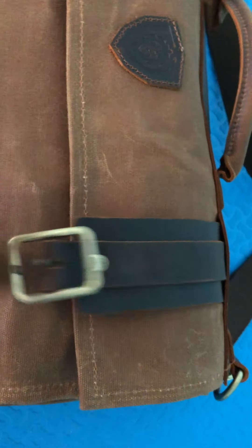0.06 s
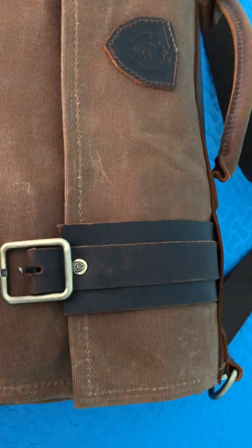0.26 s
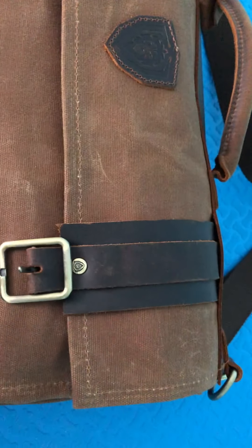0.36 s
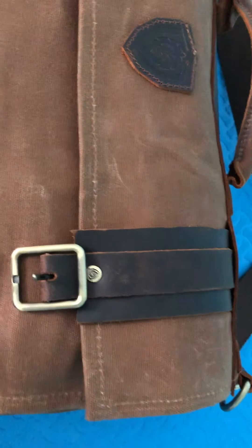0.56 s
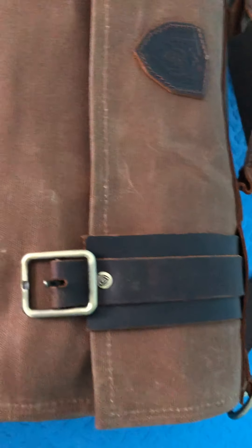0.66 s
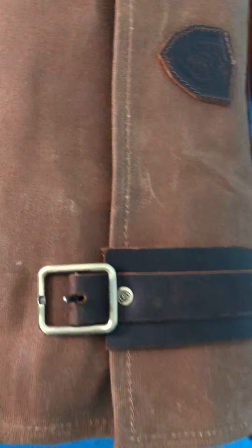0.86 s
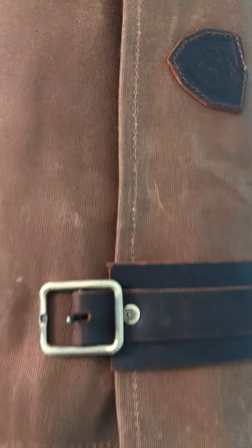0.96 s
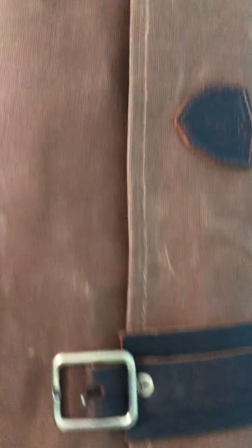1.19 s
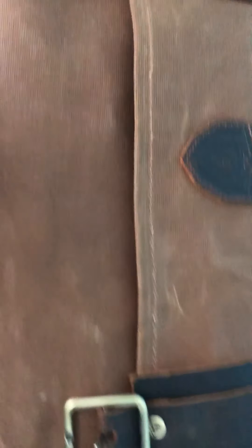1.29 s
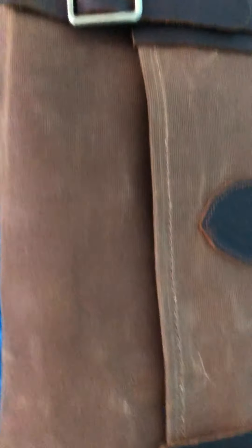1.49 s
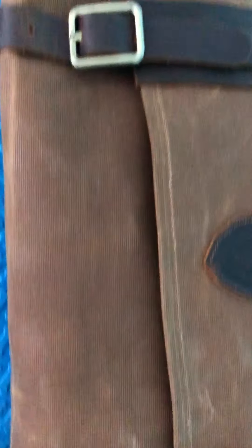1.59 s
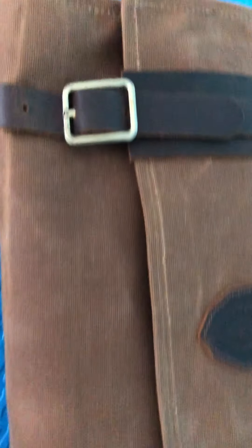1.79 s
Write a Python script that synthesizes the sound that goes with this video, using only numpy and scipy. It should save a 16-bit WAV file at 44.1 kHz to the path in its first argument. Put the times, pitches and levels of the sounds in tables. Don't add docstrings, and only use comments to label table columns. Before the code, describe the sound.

Buckle slap on a stuffed canvas bag, small metallic bounce and ticks, followed by soft fabric rubbing

```python
import sys
import numpy as np
from scipy import signal
from scipy.fft import rfft, irfft
from scipy.io import wavfile
from scipy.ndimage import uniform_filter1d

SR = 44100
rng = np.random.default_rng(int(sys.argv[2]) if len(sys.argv) > 2 else 0)


def convert_level_to_amplitude(level_db):
    exponent = np.asarray(level_db, float) / 20
    return 10 ** exponent


def unload_wav(signal):
    wavfile.write(
        sys.argv[1],
        SR,
        np.round(np.clip(np.atleast_2d(signal).T, -1, 1) * 32767).astype(np.int16),
    )


N = 81585

# (frequency [Hz], density [dB])
AIR_TONE = [(25, -29.5), (45, -4), (100, -9.5), (200, -14.5), (400, -22), (1600, -35), (16300, -39),
            (17500, -52.5)]
# (frequency [Hz], t60 [s])
ROOM_DECAY = [(100, 0.93), (260, 0.33), (700, .4), (1840, 0.4), (4850, 0.27), (9000, 0.36), (16000, .12)]
# (frequency [Hz], level [dB])
ROOM_TONE = [(100, -0.5), (300, 1.5), (700, -0.5), (1300, 2.5), (2500, -3), (5500, -6.5), (8000, -8.5),
             (16000, -18.5)]
# (start [s], rise [s], fall t60 [s], level [dB])
BRIGHT_STROKES = [
    (0.778, 0.081, 0.69, -63),
    (0.9455, 0.055, 0.31, -55),
    (.95, 0.0053, 0.6, -60.5),
    (1.465, 0.048, 0.47, -60.5),
    (1.67, 0.028, 0.42, -63),
    (0.38, 0.02, 0.33, -74.5),
]
# (frequency [Hz], density [dB])
BRIGHT_TONE = [(120, -24), (200, -3.5), (372, -2.5), (574, -8), (643, -6.5), (991, -4.5), (15200, -11.5),
               (17000, -12), (18000, -29.5)]
# (start [s], rise [s], fall t60 [s], level [dB])
DULL_STROKES = [(1.565, 0.0055, 0.41, -57.5), (1.7, 0.026, 0.22, -67.5), (.975, 0.024, 0.26, -64),
                (1.685, 0.012, 0.56, -68)]
# (frequency [Hz], density [dB])
DULL_TONE = [(180, -25), (300, 0), (620, -5), (793, -9), (1020, -3.5), (4330, -5), (12000, -22),
             (15600, -55), (22000, -120)]
# (start [s], rise [s], fall t60 [s], level [dB])
SQUEAK_STROKES = [(1.46, 0.045, 0.22, -65), (1.566, .004, 0.41, -66)]
# (start [s], rise [s], fall t60 [s], level [dB])
LEATHER_STROKES = [
    (0, 0.016, 2.3, -62),
    (.09, 0.023, 0.5, -65),
    (.25, 0.022, 1.14, -55),
    (.47, 0.041, 0.28, -58),
    (.54, 0.027, 0.34, -60.5),
]
# (frequency [Hz], density [dB])
LEATHER_TONE = [(120, -28.5), (200, 0), (918, -10.5), (2200, -10.5), (6350, -11), (7230, -20.5),
                (11300, -24.5), (12200, -26.5), (17000, -27.5)]
# (frequency [Hz], width [Hz], level [dB])
STRAP_PEAKS = [(2260, 120, -11.5), (4560, 400, -16)]
# (frequency [Hz], level [dB], t60 [s])
BOOM_MODES = [(85, -43.5, 0.23), (144.5, -38.5, 0.29), (223.7, -42, 0.25)]
# (frequency [Hz], level [dB], t60 [s])
BAG_MODES = [(176, -40, 0.15), (226.9, -27, 0.11), (270, -35, 0.1), (385, -29, 0.12), (493, -37, 0.15),
             (567, -32, 0.17), (610, -38, 0.12), (667.7, -30.5, 0.15), (760, -37, 0.11), (905, -38, .1),
             (1000, -36.5, 0.1), (1116, -36.5, 0.1), (1270, -38, .1), (1373, -35, 0.078), ]
# (time [s], peak [dB], pitch [Hz], t60 [s], crack above ring [dB])
KNOCKS = [(0.0506, -32, 5100, 0.0026, -5), (.0505, -41, 900, 0.0034, -26), (.1205, -43.5, 4500, 0.0038, 4),
          (0.2, -38, 8160, 0.0072, -28.5), (0.2199, -12, 5200, 0.0021, -6),
          (0.2205, -13, 2500, 0.0043, -24), (0.2216, -15, 1200, 0.0066, -33.5),
          (.2228, -9, 680, 0.0071, -43.5), (0.2288, -5, 5730, 0.0022, -14), (0.2294, -21, 1000, 0.014, -23),
          (.3180, -32, 5000, 0.0033, -8), (0.3202, -37.5, 5000, .004, -7), (0.322, -32, 9800, 0.0048, -7),
          (0.3234, -39, 6600, .012, -7), (.3220, -39.5, 380, 0.049, -30), (.3222, -40, 790, 0.022, -30),
          (.2330, -29.5, 8000, 0.0044, -10.5), (.0220, -53.5, 6000, .012, -7),
          (0.0528, -50.5, 450, .025, -26), (0.0576, -49, 7200, .01, -10.5), (.0990, -56, 7000, .008, -7),
          (.1190, -51.5, 2250, 0.013, -10), (0.1262, -50, 600, .02, -27.5),
          (0.175, -51.5, 10500, 0.022, -12), (.1755, -54.5, 7000, .01, -9.5),
          (.1760, -59.5, 5800, .08, -10.5), (0.487, -42.5, 5600, 0.0045, -9),
          (0.4866, -46.5, 1890, 0.013, -22), (0.5002, -42.5, 3360, 0.0052, -9),
          (0.5098, -40, 806, 0.0038, -22), (0.5458, -46, 1740, 0.031, -13), (0.545, -46, 3030, 0.02, -11),
          (.5105, -56, 5020, 0.053, -10), (.5700, -52.5, 2240, 0.06, 1), (.5580, -44, 1905, .01, -4),
          (.5740, -39.5, 407, 0.0046, -9)]
# (time [s], peak [dB], pitch [Hz], t60 [s], crack above ring [dB])
SNAGS = [(0.8821, -47.5, 2940, 0.0033, 3), (0.9852, -44, 3974, .003, 9.5), (1.3030, -54, 4300, 0.0037, 5),
         (1.508, -45.5, 4400, 0.0048, -1), (1.569, -43.5, 4370, 0.0066, -6),
         (1.692, -53.5, 5030, 0.0053, 4)]
# (time [s], low ring [dB], high ring [dB], top ring [dB], long bar ring [dB])
CHINKS = [
    (0.057, -32, -35, -44, -73.5),
    (0.174, -70, -57, -56.5, -80),
    (.2003, -46.5, -45, -46.5, -68),
    (0.2283, -51.5, -50, -34, -53),
    (0.24, -48.5, -32, -50, -63),
    (0.2401, -54.5, -33, -54.5, -69),
    (0.241, -54.5, -33.5, -59.5, -69),
    (0.2435, -54.5, -33.5, -50, -73.5),
    (0.3227, -37, -33, -31.5, -64),
    (0.5703, -75, -72, -72, -89),
]
# (frequency [Hz], level [dB], t60 [s])
LOW_RING = [(11470, -2, .045), (10900, -4, .018), (10300, -10, .008)]
# (frequency [Hz], level [dB], t60 [s])
HIGH_RING = [(15290, 0, .01), (15330, -26, .1), (14400, -7, .007)]
# (frequency [Hz], level [dB], t60 [s])
TOP_RING = [(16450, 0, .01), (16750, -20, .15), (16690, -25, .15)]
# (frequency [Hz], level [dB], t60 [s])
BAR_RING = [(12840, -1, .4), (12862, -16, .3), (11460, -1, .3), (11435, -11, .2), (5770, 0, .15)]
# (frequency [Hz], level [dB])
TREBLE_SHELF = [(17200, 0), (17500, -22), (19300, -26)]

SLAP_S = 0.2215


def evened(x):
    return x / np.sqrt(np.mean(x ** 2) + 1e-20)


def read(points, hz):
    f, value = np.transpose(points)
    return np.interp(np.log(hz + 1), np.log(f + 1), value)


def filtered(x, tone):
    hz = np.fft.rfftfreq(len(x), 1 / SR)
    return irfft(rfft(x) * convert_level_to_amplitude(read(tone, hz)), len(x))


def high_pass(x, order, edge_hz):
    return signal.sosfilt(signal.butter(order, edge_hz, "high", fs=SR, output="sos"), x)


def resonate(x, hz, width):
    turn = np.exp(2j * np.pi * hz * np.arange(len(x)) / SR)
    r = np.exp(-np.pi * width / SR)
    return 2 * (turn * signal.lfilter([1 - r], [1, -r], x / turn)).real


def ring(modes, rise_s):
    t = np.arange(SR // 2) / SR
    dying = sum(convert_level_to_amplitude(db - 60 * t / t60) * np.sin(2 * np.pi * hz * t) for hz, db, t60 in modes)
    return (1 - np.exp(-t / rise_s)) * dying


def add(mix, s, sound):
    part = mix[round(s * SR):][:len(sound)]
    part += sound[:len(part)]


def strokes(table):
    t = np.arange(N) / SR
    power = np.zeros(N)
    for start, rise, fall, db in table:
        swell = np.clip((t - start) / rise, 0, 1)
        decay_db = 60 * np.maximum(t - start - rise, 0) / fall
        power += (swell * convert_level_to_amplitude(db - decay_db)) ** 2
    return np.sqrt(power)


def grit(slips_per_s, spread_db, smooth_db):
    slipping = rng.random(N) < slips_per_s / SR
    size = np.minimum(rng.exponential(1, N), 4)
    slips = slipping * rng.standard_normal(N) * convert_level_to_amplitude(spread_db * size)
    return evened(slips) + convert_level_to_amplitude(smooth_db) * rng.standard_normal(N)


def quiet_room():
    t = np.arange(N) / SR
    hiss, rumble, waver = rng.standard_normal((3, N))
    for _ in range(2):
        rumble = resonate(rumble, 60.13, 8.8)
        waver = uniform_filter1d(waver, size=4000)
    hum_db = -64 + 1.2 * evened(waver)
    hum = np.sqrt(2) * convert_level_to_amplitude(hum_db) * np.sin(2 * np.pi * 121.2 * t + 1.6)
    return convert_level_to_amplitude(-64) * evened(filtered(hiss, AIR_TONE)) + convert_level_to_amplitude(-65.5) * evened(rumble) + hum


def room(x):
    room_db, start_s, spacing = -17, 0.0025, 20
    taps = np.zeros(SR)
    at = np.arange(0, SR - spacing, spacing)
    taps[at + rng.integers(0, spacing, len(at))] = rng.choice([-1., 1.], len(at))
    hz, t, z = signal.stft(taps, SR, nperseg=256)
    decay_db = 60 * t / read(ROOM_DECAY, hz)[:, None]
    tail = signal.istft(z * convert_level_to_amplitude(read(ROOM_TONE, hz)[:, None] - decay_db), SR, nperseg=256)[1]
    fade_in = np.clip(np.arange(len(tail)) / SR / start_s - 1, 0, 1)
    tail = tail / np.linalg.norm(tail) * fade_in
    return convert_level_to_amplitude(room_db) * signal.fftconvolve(x, tail)[:N]


def bag_boom():
    out = np.zeros(N)
    add(out, SLAP_S, ring(BOOM_MODES, 0.014))
    return out


def cloth():
    bright = strokes(BRIGHT_STROKES) * evened(filtered(grit(2500, 2.1, 1.4), BRIGHT_TONE))
    dull = strokes(DULL_STROKES) * evened(filtered(grit(3000, 3.0, 2.5), DULL_TONE))
    squeak = strokes(SQUEAK_STROKES) * evened(resonate(grit(2300, 2.8, 1.6), 4500, 820))
    return bright + dull + squeak


def leather():
    rub = evened(filtered(grit(4000, 2.2, 3.0), LEATHER_TONE))
    peaks = sum(convert_level_to_amplitude(db) * evened(resonate(rub, hz, width)) for hz, width, db in STRAP_PEAKS)
    return strokes(LEATHER_STROKES) * (rub + peaks)


def bag_slap():
    out = np.zeros(N)
    add(out, SLAP_S, ring(BAG_MODES, 0.003))
    return out


def knocks():
    partner_spread, partner_db, crack_hz, crack_t60_s = 0.25, -6.5, 7200, 0.005
    out = np.zeros(N)
    t = np.arange(SR // 10) / SR
    rows = [*KNOCKS, *SNAGS]
    noise = rng.standard_normal((len(rows), len(t)))
    cracks = signal.lfilter(*signal.butter(1, crack_hz, fs=SR), noise)
    offsets = rng.uniform(0.43, 1, len(rows)) * rng.choice([-1, 1], len(rows))
    ratios = 1 + partner_spread * offsets
    for (s, db, hz, t60, crack_db), crack, ratio in zip(rows, cracks, ratios):
        pair = np.sin(2 * np.pi * hz * t) + convert_level_to_amplitude(partner_db) * np.sin(2 * np.pi * hz * ratio * t)
        tone = convert_level_to_amplitude(-60 * t / t60) * pair * (1 - np.exp(-t / .0001))
        dying_crack = crack * convert_level_to_amplitude(crack_db - 60 * t / crack_t60_s)
        add(out, s, convert_level_to_amplitude(db) * (tone + dying_crack))
    return out


def chinks():
    out = np.zeros(N)
    groups = np.array([ring(modes, 0.00033) for modes in (LOW_RING, HIGH_RING, TOP_RING, BAR_RING)])
    for s, *levels in CHINKS:
        add(out, s, convert_level_to_amplitude(np.array(levels)) @ groups)
    return out


def scene():
    buckle = high_pass(bag_slap() + knocks() + chinks(), 3, 140)
    background = quiet_room() + room(buckle) + bag_boom()
    return (background + cloth() + leather() + buckle)[None]


def top_cut(x):
    return signal.sosfilt(signal.butter(12, 19250, fs=SR, output="sos"), x)


def record(dry):
    mix = high_pass(dry, 2, 59.6)
    mix = filtered(mix[0], TREBLE_SHELF)[None]
    return top_cut(mix)


dry = scene()
out = record(dry)
unload_wav(out)
```